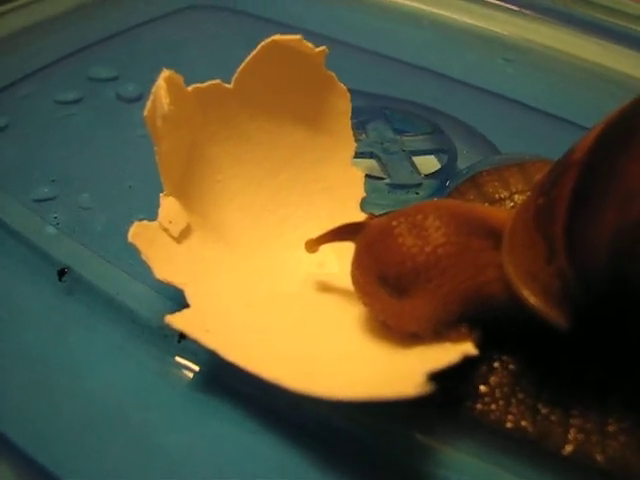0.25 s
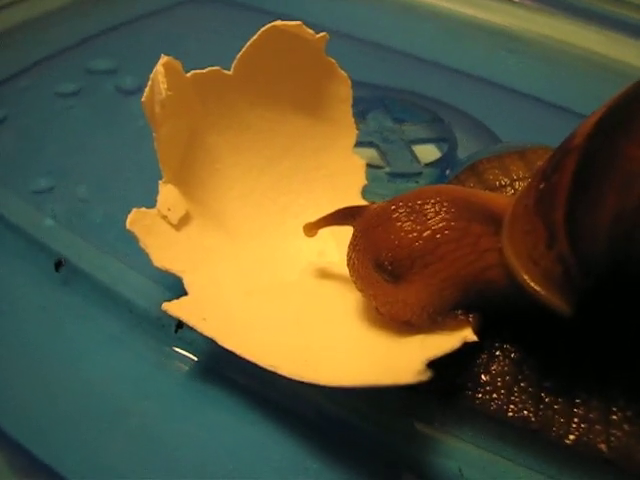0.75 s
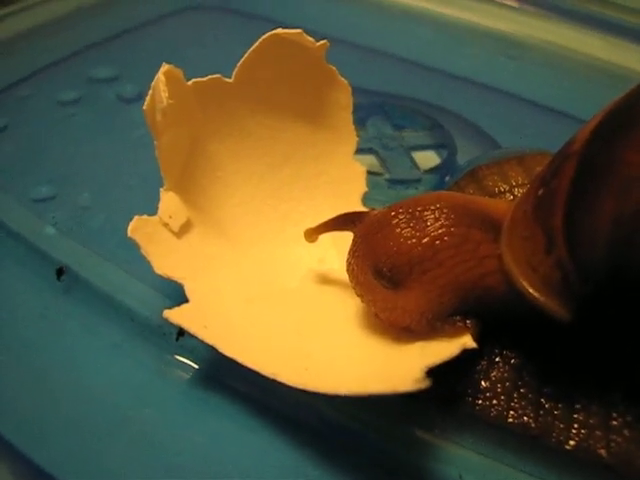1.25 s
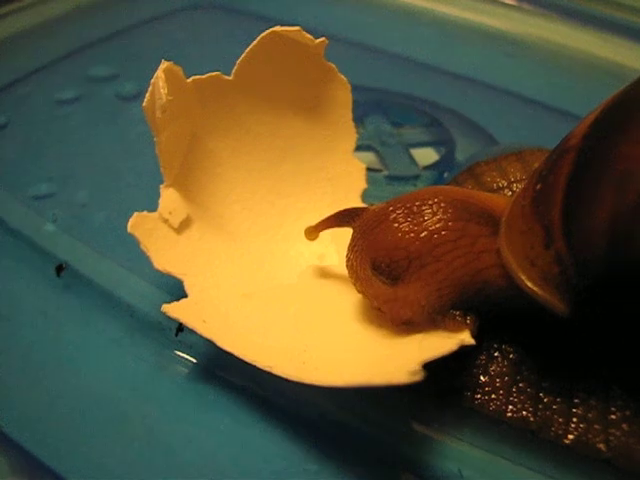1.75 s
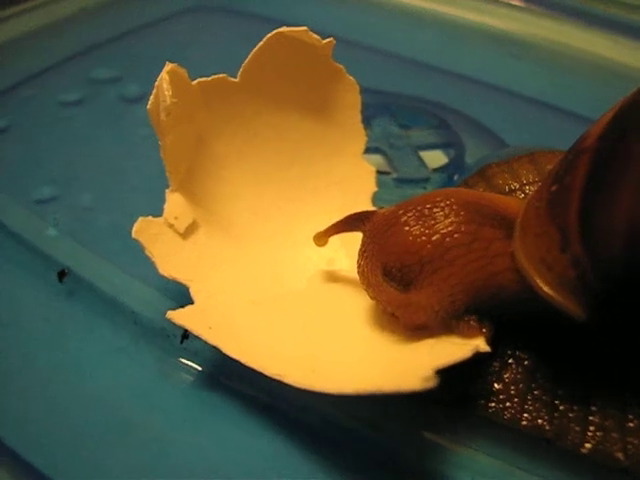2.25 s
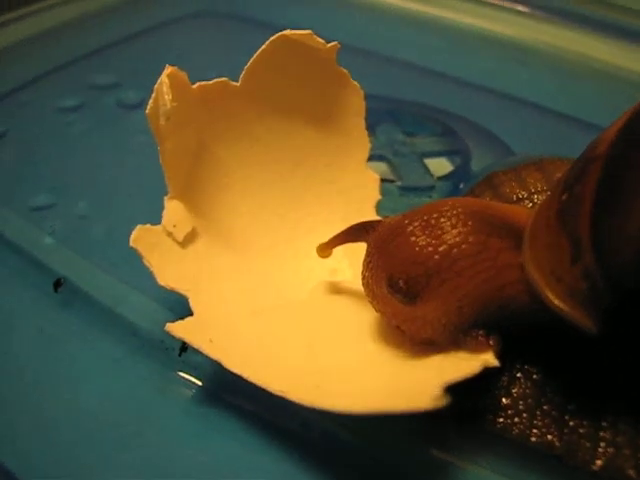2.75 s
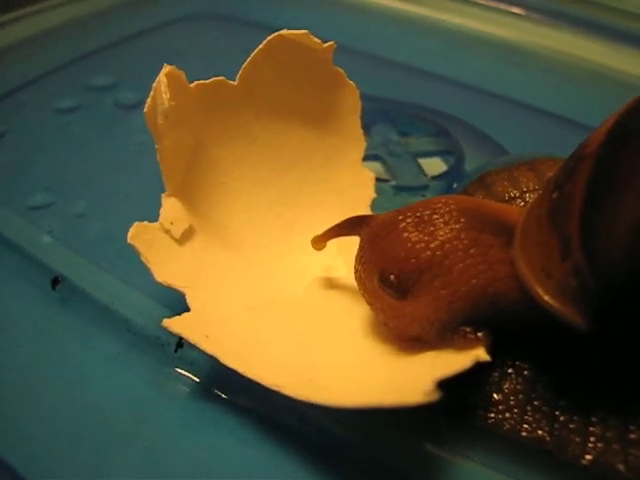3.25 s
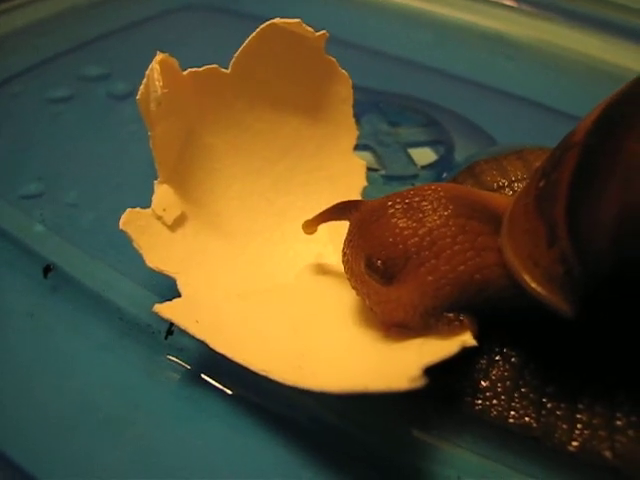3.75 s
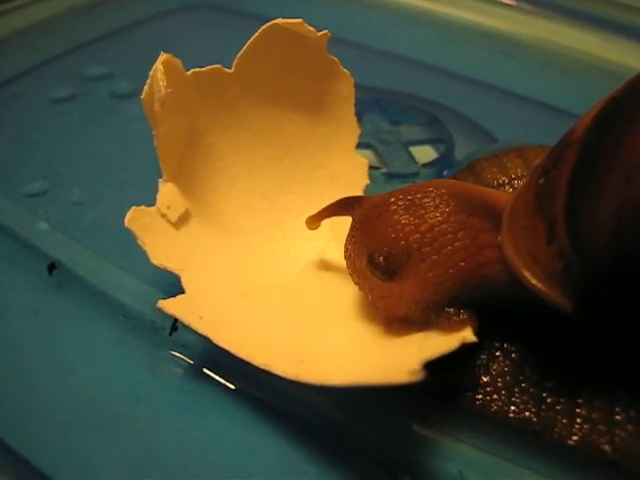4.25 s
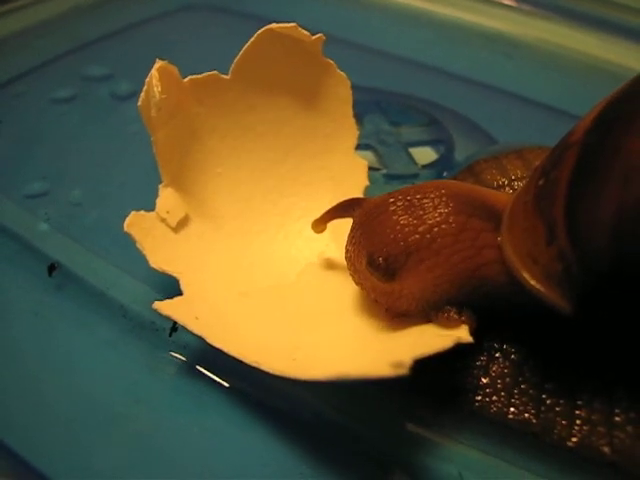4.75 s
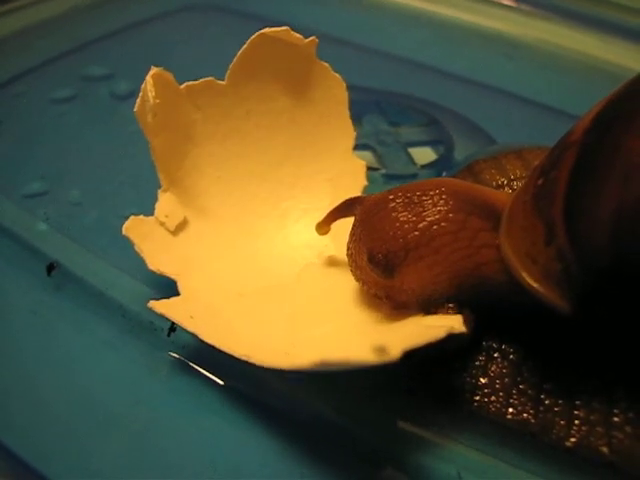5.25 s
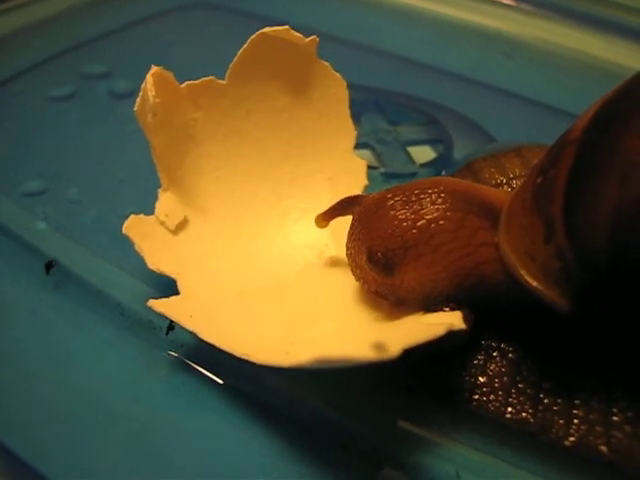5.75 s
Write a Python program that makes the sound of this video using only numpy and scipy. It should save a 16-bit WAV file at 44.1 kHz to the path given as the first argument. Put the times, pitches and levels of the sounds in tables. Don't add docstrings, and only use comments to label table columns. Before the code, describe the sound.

Close and dry in a small quiet room: faint hiss, hum and a steady very high tone underneath. After about a second, a brief crackling scrape of brittle shell, then mostly quiet with dull knocks from the hand-held camera and swelling rumble. Near four seconds the scratching returns harder, breaking into irregular bright cracks with faint short echoes, thinning towards the end.

```python
import sys
import numpy as np
from scipy import signal
from scipy.io import wavfile
from scipy.ndimage import uniform_filter1d, minimum_filter1d

SR = 44100
rng = np.random.default_rng(int(sys.argv[2]) if len(sys.argv) > 2 else 0)


def invert_db(level):
    return 10 ** (np.asarray(level, dtype=float) / 20)


def generate_wav(sig):
    pcm = np.round(np.clip(np.atleast_2d(sig).T, -1, 1) * 32767).astype(np.int16)
    wavfile.write(sys.argv[1], SR, pcm)


N = 264600

# f/Hz, level per Hz/dB
MURMUR = [(15, -36), (30, -33), (60, -17), (93, 0.5), (180, -6.5), (300, -2), (500, -6), (1000, -7.5),
          (1400, -9.5), (6800, -14), (8500, -13), (11000, -19), (15500, -23)]
# f/Hz, likeness/1
MURMUR_LIKENESS = [(60, 0.98), (160, 0.47), (420, 0.69), (1130, 0.28), (3010, 0.4), (8000, 0.031)]
# f/Hz, left-right level/dB
MURMUR_LEAN = [(60, -0.64), (160, -1.1), (420, 1), (1130, 1), (3010, -1.6), (8000, -0.11)]
# t/s, level/dB
HAND_SHIFTS = [
    (.1, -2),
    (1.73, 3),
    (2.02, 9.5),
    (2.3, 4),
    (2.9, 14),
    (3.37, 5),
    (3.69, 5),
    (4.77, 12),
    (5.11, 7),
    (5.5, 13),
]
# t/s, level/dB
GRIP = [(0.0, -47.5), (0.05, -51.5), (1.38, -50.5), (1.5, -54), (1.74, -49.5), (1.79, -54.5), (3.59, -54.5),
        (3.66, -56.5), (3.69, -50.5), (3.89, -56), (4.8, -57.5), (4.83, -58), (4.98, -56), (5.16, -57.5),
        (5.82, -54), (6.0, -56.5)]
# f/Hz, width/Hz, level/dB
BODY = [(401.8, 25.7, -12), (603.3, 46, -3.5), (1013, 87, 2.5), (726, 360, -34), (1330, 260, -23),
        (1230, 310, -9.5)]
# left-right level/dB, left lead/rad
BODY_PORTS = [(11.5, 0.085), (6, 1.3), (-14, 2.15), (11, 2), (-4, 2.7), (-17, 0.73)]
TREMOR_DB = [-6, -9, -11, -5, -20, -25]
# f/Hz, line it repeats on f/Hz, first restart t/s
WHINE_TONES = [(7867.13, 7852.15, .0048), (8262.5, 8250.05, .021)]
# left level/dB, right level/dB, left lead/rad
WHINE_PORTS = [(-48.5, -46, 0.24), (-58.5, -50.5, 2.24)]

# f/Hz, width/Hz, level/dB, left-right level/dB
SHELL_DEEP = [(1290, 250, -8, -6), (1630, 83, 3, -5), (1960, 100, 7, 2)]
SHELL_LOW = [(1480, 240, -9, -4), (2060, 195, -0.5, 1.5), (2890, 236, 2.5, -4.5), (3466, 193, 2, -7),
             (3616, 260, -1, 4)]
SHELL_MID = [(4940, 1230, 4.5, -1.5), (5440, 750, 6.5, -0.5)]
SHELL_MAIN = [(5600, 1670, -5.5, 4), (6203, 313, 10.5, -3)]
SHELL_UPPER = [(7080, 180, 0, 2)]
SHELL_EDGE = [(8380, 1250, -0.5, -16), (9780, 480, -6, -7), (11280, 900, -7, 2), (12630, 1300, -2.5, 1),
              (15800, 2300, 1, 3)]
# t/s, main ring level/dB, then low, middle and upper rings level re main/dB; here the first ticks,
# the light stroke, sparse slips after it and the start of the hard stroke
EARLY_SLIPS = [(0.0532, -49, -5.0, 15, -27), (0.1627, -42, 9, 7, 3), (0.1636, -44.0, -9, 17, -2),
               (1.1373, -42, 1, -3.0, -2.0), (1.1731, -33, -3, -15.0, -5), (1.1846, -19, -8, -7, 1),
               (1.1921, -40, -12.0, -17.0, -8.0), (1.1997, -40.0, -2.0, -1, -12.0),
               (1.2037, -39.0, -7.0, -16.0, -12.0), (1.206, -42.0, 5.0, -1.0, -1.0),
               (1.2169, -44.0, 0.0, 3.0, 3.0), (1.2178, -44.0, 1.0, 4.0, 1), (1.229, -26, -13.0, -8, -9),
               (1.256, -31, -6.0, -6, -4), (1.2585, -34, -10, -4.0, -7.0), (1.2627, -23, -23, -4, -14.0),
               (1.2659, -33, -10.0, -1.0, -9.0), (1.2682, -36.0, -14.0, -7.0, -9.0),
               (1.2717, -43.0, -11.0, -5.0, -2.0), (1.275, -38.0, -29.0, -13.0, -10.0),
               (1.2773, -40.0, 0, -4.0, -3.0), (1.2777, -42, -6, -10.0, -8.0),
               (1.2807, -46.0, 1.0, 0.0, 0.0), (1.2906, -32.0, -21.0, -11.0, -9.0),
               (1.295, -19, -9, -10, -12), (1.3004, -39.0, -7, -6.0, -4.0), (1.3019, -37, -4.0, -3.0, -2),
               (1.302, -42, -4.0, -10.0, -4), (1.3035, -45.0, -1, -4.0, 3.0),
               (1.3053, -39.0, -7.0, -20.0, -2), (1.3247, -41.0, -23.0, -3.0, -27.0),
               (1.3411, -23, -0.5, 10, 8), (1.3437, -31, -6, -11, -10), (1.3427, -39, -16, -15, -1),
               (1.3748, -30, -6, -12, 1), (1.3985, -27.5, 1, -6, -9.0), (1.4106, -43, -3, -11.0, -11.0),
               (1.4204, -28, 0, -14, -4), (1.4231, -31, -6, -21.0, -8.0), (1.4268, -19.5, -13, -9, -7),
               (1.4475, -36, -5, -23.0, -3.0), (1.459, -20.5, -5.5, -22, -7),
                 (1.465, -25.0, -8, -17.0, -11.0), (1.4725, -40, -2, -7.0, -7.0),
                 (1.4956, -25.0, -19.0, -13, 0), (1.507, -34.0, -7, -24.0, -9.0),
                 (1.511, -39, -1.0, -12.0, -6.0), (1.5123, -37.0, 2, -21.0, -6.0),
                 (1.5342, -28.5, -1, -12, -9.0), (1.5598, -11.5, -7, -17, -14), (1.5619, -18, 1, 7, -11.0),
                 (1.5632, -14.5, -2, 4, -12), (1.5727, -41, 1.0, 1.0, -10.0), (1.5778, -28, -11, -9, -10),
                 (1.5788, -19, -17, -9.0, -10.0), (1.6878, -44, 10, 3.0, 1), (1.7291, -36.0, 7.5, 10, -3),
                 (2.0538, -25, -13, -15, -12.0), (2.06, -34, -5, -5, -7), (2.0628, -29, -5, -6, -10),
                 (3.6819, -37, 8.0, 7, 3), (3.6963, -39, 5, 5, 8), (3.7246, -42, 11.0, 9, -2.0),
                 (3.8472, -40, -5, 10, 10), (3.8562, -43.0, -4.0, -2, -4), (3.8763, -36, -4, -1, -3.0),
                 (3.8894, -45, -1, 10, 7.0), (3.9337, -32.0, -15, -5.0, 1), (3.9441, -35, -1.0, 0.0, -5.0),
                 (3.949, -37.0, 1, 0, 5), (3.9486, -39.0, -7.0, -3.0, 3.0), (3.949, -35, -4, -7.0, 1.0),
                 (3.9578, -34.5, -3.0, -9.0, 4), (3.9604, -46.0, -5.0, -3.0, 1.0),
                 (3.9622, -45, -1, -11.0, -1.0), (3.9949, -24.5, -10.0, -7, 1),
                 (4.0021, -40.0, -17.0, -20.0, 4), (4.0277, -26.0, -3.0, 5, -8),
                 (4.031, -33, -4, -6.0, -1.0), (4.039, -32, -13.0, -5.0, -3.0)]
HARD_SLIPS = [(4.0548, -36.0, -10, -2.0, 4), (4.0562, -34, -10.0, -7.0, -7.0),
              (4.0571, -32.0, -12, -7.0, -5.0), (4.0612, -28.0, 1, -11.0, -12.0),
              (4.0675, -25.5, -0.5, 8, 2), (4.0748, -16.0, -11, -0.5, -5), (4.0827, -26, -10.0, -3.0, 1),
              (4.0882, -40, -4.0, 0.0, -2.0), (4.0939, -30, -19.0, -6.0, -3), (4.0995, -30, -13, -5.0, -1),
              (4.1053, -35.0, -11, -8.0, -15), (4.114, -29, -12, -7.0, -1),
              (4.1277, -38.0, -17.0, -32.0, -7.0), (4.139, -30.0, -21.0, -14.0, -19.0),
              (4.141, -31, -8, -10.0, -1.0), (4.1515, -29, -9, -4.0, -5.0), (4.1529, -30.0, -3, -2, -6),
              (4.1548, -10, -10.5, -15, 3), (4.174, -20, -20.0, -8, -3.0), (4.1876, -25, -17.0, -9, -1.0),
              (4.1898, -13.0, -10.5, -12, -0.5), (4.2275, -30, 3, -4, 4), (4.2292, -26, -17, 8, -2.0),
              (4.2303, -17.5, -12, 6, -15), (4.2344, -28, -16, -12.0, -8.0),
              (4.2406, -39.0, -3.0, 1.0, -6.0), (4.256, -19, -9, -16.0, 3), (4.2581, -11.0, -12.0, -1, 4.5),
              (4.2705, -30.0, -13.0, -14.0, 1.0), (4.2716, -33, -11.0, -9.0, 1.0),
              (4.2755, -32.0, -12.0, -12.0, -5.0), (4.287, -16, -16, -14, -7),
              (4.2923, -15.5, -17.0, -12.0, -11), (4.2962, -18.0, -16.0, -13.0, -4),
              (4.306, -24, -5, -10.0, -15), (4.316, -19, 3, 8, 8), (4.3204, -18.5, -1.0, -3.0, 1),
              (4.3224, -12, -11, -4.0, 2), (4.3344, -33, -7.0, -11.0, -1.0),
              (4.335, -35, -7.0, -14.0, -4.0)]
BITES = [(4.3799, -33, -11.0, -4, 3), (4.3821, -13.5, 0.0, 8, -4), (4.3949, -19, -5, 0, -5.0),
         (4.3973, -25, -4.0, -6.0, -8), (4.4002, -24, -22, -12, 2), (4.4011, -18, -4.5, -11, -10),
         (4.4158, -32.0, -8.0, -2.0, -7.0), (4.4447, -23.0, -16.0, -11, -10),
         (4.5033, -36.0, -16.0, -5.0, -26.0), (4.5188, -31.5, -8.0, -3, -3.0), (4.563, -26, -7.0, 2, 0),
         (4.5958, -31, -14.0, -11.0, -10.0), (4.6159, -16.5, -16, -1, -8), (4.645, -5.5, -8.5, 1, -14),
         (4.7009, -17, -4, -10.0, -7), (4.7041, -34, 2, -3, -5.0), (4.708, -4.5, -11.0, 2.5, -16),
         (4.7599, -11, -2.5, -3, -2.0), (4.7737, -4.5, -12, 3, -15), (4.785, -10, -6.5, -15, 0),
         (4.7933, -23, -12, -10.0, -11.0), (4.8097, -1.5, -7.5, -14, -15), (4.8686, -17, -7.5, 1, -3),
         (4.871, -13.5, -10.0, -8.0, -12), (5.017, -33.0, -15, -14, -12), (5.1065, -4, -19, -5.5, -34),
         (5.1106, -8.5, -6, -6.0, -20), (5.2208, -34, 1, 2, -15.0), (5.37, -41, -3.0, 0.0, -19.0),
         (5.4521, -38, -9.0, -3.0, -3.0), (5.4568, -6.0, -10.5, 5, -7), (5.466, -26, -13.0, -6.0, -2.0),
         (5.4814, -8.5, -10.5, -14, -5.0), (5.5168, -11, 1, -7, 7), (5.5185, -5, -10.5, -10, -7),
         (5.533, -37.0, 4.0, -3.0, 1.0), (5.5334, -29.0, -3, -5, -3.0), (5.5366, -29, 0.0, 11, -5.0),
         (5.5388, -29, -4, 0, -3.0), (5.5428, -34.0, -5, -4.0, -4.0)]
# f/Hz, width/Hz
SHELL_DIPS = [(4150, 400)]
# t/s, level/dB
WALL_ECHOES = [
    (0.0126, -23),
    (0.0176, -33.5),
]
# f/Hz, time to fall 60 dB t/s
ROOM_DECAY = [(300, 0.076), (2000, 0.24), (6000, 0.3), (12000, 0.14)]
# f/Hz, level/dB
ROOM_COLOUR = [(1500, 2), (2300, 13), (3300, 6.5), (4500, 2.5), (5500, 1.5), (6250, 0.5), (7200, 4.5),
               (9000, 3.5)]
# t/s, peak level/dB
ROCKS = [(.1636, -40), (1.34, -32), (1.5592, -26), (4.1542, -27), (4.323, -40), (5.1063, -29),
         (5.4562, -20), (5.4813, -40), (5.519, -18), (2.062, -38), (4.3822, -38), (4.6433, -44)]
# t/s, peak level/dB, thin tick level re peak/dB
CREAKS = [(0.166, -45.5, 21), (0.287, -45.5, -6), (0.778, -42.5, -1), (0.9721, -40.5, 2.5),
          (1.3379, -55, 1), (1.5656, -39, 20), (1.586, -41, 14.5), (1.619, -39, 1), (1.6415, -36.5, -3),
          (1.649, -38.5, -10), (1.6879, -32.5, 1), (1.728, -29, 6), (1.7396, -68, -10.0),
          (3.1662, -47, -9.5), (3.2053, -41, -18), (3.2531, -40.5, -16), (3.365, -36, -6), (3.6819, -32, 0),
          (3.696, -32.5, 2), (3.7251, -30, 7), (3.1435, -46.5, -12), (3.1865, -46, -12), (3.2202, -47, -12),
          (1.599, -47, -12), (2.001, -47.5, -12), (2.646, -45.5, -8)]
# f/Hz, width/Hz, level/dB, left-right level/dB
CREAK_TICK = [(1660, 390, -2, -5), (2780, 990, -4.5, -8), (3400, 490, 6, -12), (4170, 470, -3.5, -10),
              (5230, 1100, 5, -19)]
# start t/s, length t/s, level/dB
DRAGS = [
    (0.88, 0.36, -56),
    (1.164, 0.18, -50.5),
    (1.362, 0.19, -48.5),
    (3.83, 0.12, -55),
    (4.03, 0.14, -49.5),
    (4.21, 0.12, -48),
    (4.625, 0.19, -43.5),
    (5.338, .06, -68),
    (5.468, 0.14, -47.5),
]


def read(points, hz):
    f, value = np.transpose(points)
    return np.interp(np.log(hz + 1), np.log(f + 1), value)


def evened(x):
    return x / np.sqrt(np.mean(x ** 2) + 1e-20)


def add(mix, s, sound):
    part = mix[:, round(s * SR):][:, :sound.shape[1]]
    part += sound[:, :part.shape[1]]


def above(x, hz):
    return signal.sosfilt(signal.butter(3, hz, "high", fs=SR, output="sos"), x)


def hiss(level_db=-48.5, patchy_db=1.47, shift_s=0.029):
    frames, hz = N // 256 + 5, np.fft.rfftfreq(1024, 1 / SR)
    a, b, c, d, patches = rng.standard_normal((frames, 513, 5)).T
    patches = evened(uniform_filter1d(uniform_filter1d(patches, 6, 0), 10, 1))
    patches = patches * (1 + 100 / (hz + 200))[:, None]

    same = np.clip(read(MURMUR_LIKENESS, hz), -1, 1)[:, None]
    left = a + 1j * b
    right = same * left + np.sqrt(1 - same ** 2) * (c + 1j * d)
    z = np.array([left, right])
    z *= invert_db(read(MURMUR, hz)[:, None] + patchy_db * patches)

    s, grip_db = np.transpose(GRIP)
    t = np.arange(frames) * 256 / SR
    rumble_db = np.interp(t, s, grip_db - grip_db.mean())
    for at, db in HAND_SHIFTS:
        rumble_db = rumble_db + db * np.exp(-((t - at) / shift_s) ** 2)
    z *= invert_db(rumble_db / (1 + (hz[:, None] / 300) ** 2))
    z *= invert_db(read(MURMUR_LEAN, hz)[:, None] * np.array([.5, -.5])[:, None, None])
    noise = signal.istft(z, nperseg=1024, noverlap=768)[1][:, :N]
    return invert_db(level_db) * evened(noise)


def body(blows, levels_db):
    t, taps, side = np.arange(3000) / SR, 0, np.array([[.5], [-.5]])
    for (hz, width, _), db, (lean_db, lead) in zip(BODY, levels_db, BODY_PORTS):
        swing = np.sin(2 * np.pi * hz * t + lead * (side + .5))
        taps = taps - invert_db(db + lean_db * side) * np.exp(-np.pi * width * t) * swing
    return signal.oaconvolve(blows[None], taps)[:, :N]


def hum(per_s=500., spread_db=4.0):
    size = invert_db(spread_db * np.minimum(rng.exponential(1, N), 3))
    pushes = rng.standard_normal(N) * size * (rng.random(N) < per_s / SR)
    level = invert_db(np.interp(np.arange(N) / SR, *np.transpose(GRIP)))
    return evened(above(body(pushes, TREMOR_DB), hz=334)) * level


def whine(frame_hz=30000 / 1001):
    out = 0
    for (hz, line_hz, s), (left_db, right_db, lead) in zip(WHINE_TONES, WHINE_PORTS):
        t = np.arange(N) / SR - s
        start = np.floor(t * frame_hz) / frame_hz
        phase = 2 * np.pi * (hz * (t - start) + line_hz * start)
        out = out + invert_db([[left_db], [right_db]]) * np.sin([phase + lead, phase])
    return out


def ring(modes, t, chance, scatter_db=2.0, detune=.012):
    port_lag_s = .000017
    rise_s, first_swing_s, lasting_share = 0.00019, .0005, .4
    hz, width, db, lean_db = np.transpose(modes)[:, :, None]
    size, tune, start, port = chance[:len(modes)].T[:, :, None]
    phase = 2 * np.pi * hz * (1 + detune * tune) * t + .3 * start
    left = invert_db(lean_db / 2) * np.sin(phase)
    right = invert_db(-lean_db / 2) * np.sin(phase - 2 * np.pi * hz * port_lag_s + .15 * port)
    dying = invert_db(db + scatter_db * size) * np.exp(-np.pi * width * t)
    both = -(dying * np.array([left, right])).sum(1)
    both = both * (1 - np.exp(-(t / rise_s) ** 2))
    both = both * (lasting_share + (1 - lasting_share) * np.exp(-(t / first_swing_s) ** 2))
    return both / np.abs(both.mean(0)).max()


def snap(levels_db, chance):
    t = np.arange(700) / SR
    rings = (SHELL_MAIN, SHELL_LOW, SHELL_MID, SHELL_UPPER, SHELL_EDGE)
    return sum(invert_db(db) * ring(modes, t, c) for modes, db, c in zip(rings, levels_db, chance))


def snaps():
    out, rows = np.zeros((2, N)), EARLY_SLIPS + HARD_SLIPS + BITES
    chances = rng.standard_normal((len(rows), 5, 5, 4))
    for (s, db, low_db, mid_db, upper_db), chance in zip(rows, chances):
        edge_db = -9.5 + 0.3 * db - chance[0, 4, 0]
        levels_db = [0, low_db - 1.5, mid_db - 2.5, upper_db - 4.0, edge_db]
        add(out, s, invert_db(db + 5.5) * snap(levels_db, chance))
    return out


def cup(x):
    for hz, width in SHELL_DIPS:
        x = .25 * x + .75 * signal.lfilter(*signal.iirnotch(hz, hz / width, SR), x)
    return above(x, hz=1410)


def tray(x):
    taps = np.zeros((2, 480))
    at = rng.integers(50, 480, (2, 24))
    np.put_along_axis(taps, at, rng.standard_normal(at.shape) * np.exp(-at / 300.0), 1)
    taps = taps / np.linalg.norm(taps, axis=1)[:, None]
    return signal.oaconvolve(x, taps, axes=1)[:, :N]


def room(x):
    taps = np.zeros((2, SR // 2))
    at = np.arange(500, SR // 2 - 20, 20) + rng.integers(0, 20, (2, (SR // 2 - 501) // 20))
    np.put_along_axis(taps, at, rng.choice([-1., 1.], at.shape), 1)
    hz, t, z = signal.stft(taps, SR, nperseg=128)
    tail_db = read(ROOM_COLOUR, hz)[:, None] - 60 * t / read(ROOM_DECAY, hz)[:, None]
    tail = signal.istft(z * invert_db(tail_db), SR, nperseg=128)[1]
    return signal.oaconvolve(x.mean(0)[None], tail / np.sqrt(SR / 900), axes=1)[:, :N]


def rocks():
    out, t = np.zeros((2, N)), np.arange(700) / SR
    for (s, db), chance in zip(ROCKS, rng.standard_normal((len(ROCKS), 3, 4))):
        add(out, s, invert_db(db) * ring(SHELL_DEEP, t, chance))
    return out


def creaks():
    blows, ticks, t = np.zeros(N), np.zeros((2, N)), np.arange(300) / SR
    for (s, db, tick_db), chance in zip(CREAKS, rng.standard_normal((len(CREAKS), 5, 4))):
        blows[round(s * SR)] = invert_db(db + 2.5)
        add(ticks, s, invert_db(db + tick_db) * ring(CREAK_TICK, t, chance))
    return body(blows, np.transpose(BODY)[2]) + ticks


def grit(per_s=700.0, spread_db=7.0, rise_s=0.027, fall_s=0.038):
    t, out, level = np.arange(N) / SR, np.zeros((2, N)), np.zeros(N)
    for s, length, db in DRAGS:
        swell = np.minimum((t - s) / rise_s, (s + length - t) / fall_s)
        level += invert_db(db) * np.clip(swell, 0, 1)
    kind = rng.integers(0, 12, N)
    size = invert_db(spread_db * np.minimum(rng.exponential(1, N), 2)) * (rng.random(N) < per_s / SR)
    for k, chance in enumerate(rng.standard_normal((12, 5, 5, 4))):
        tiny_snap = snap([2, -1.0, -11.0, -2.0, -11.0], chance)
        out += signal.oaconvolve((size * (kind == k))[None], tiny_snap)[:, :N]
    return evened(out) * level


def lid(hz=790, t60_s=0.063, level_db=-47, rise_s=0.0066):
    out, t = np.zeros((2, N)), np.arange(8000) / SR
    wave = np.sin(2 * np.pi * hz * t) * np.minimum(t / rise_s, 1) * np.ones((2, 1))
    for s, db, *_ in HARD_SLIPS + BITES:
        add(out, s, invert_db(db / 2 + 5.0 + level_db - 60 * t / t60_s) * wave)
    return out


def scene():
    shell = cup(snaps() + grit())
    echoes = invert_db(-22.5) * tray(shell) + invert_db(-16.0) * room(shell)
    for s, db in WALL_ECHOES:
        add(echoes, s, invert_db(db) * shell[::-1])
    camera = above(creaks(), hz=199) + hum() + hiss() + whine()
    return shell + echoes + lid() + camera + above(rocks(), hz=1090)


def starve(x):
    hz, _, z = signal.stft(x, SR, nperseg=256)
    power_db = 10 * np.log10(uniform_filter1d((np.abs(z) ** 2).mean(0), size=6, axis=0) + 1e-20)
    recent_db = -minimum_filter1d(-power_db.max(0), size=13, origin=4)
    luck = np.kron(rng.standard_normal((22, len(recent_db) // 3 + 1)), np.ones((6, 3)))
    luck = luck[:len(hz), :len(recent_db)]
    mark_db = -64.5 + .25 * recent_db - 8 * (hz[:, None] / 15000) ** 2 + 4 * luck
    kept = (power_db > mark_db) | (hz[:, None] < 8700) | (recent_db < -45)
    return signal.istft(z * kept, SR, nperseg=256)[1][:, :N]


def roll_off(x):
    return signal.sosfilt(signal.butter(12, 15700, fs=SR, output="sos"), x)


def record(dry):
    recover_s, dip_start_db, dip_share = .085, -11, .75
    peak_db = 20 * np.log10(uniform_filter1d(np.abs(dry).max(0), 40) + 1e-9)
    fall = np.arange(N) / SR / recover_s
    excess = np.log(np.maximum(np.minimum(peak_db, 0) - dip_start_db, 1e-9))
    over_db = np.exp(np.maximum.accumulate(excess + fall) - fall)
    late_db = signal.lfilter([1 / 200], [1, 1 / 200 - 1], over_db)
    clipped = np.clip(dry / invert_db(dip_share * late_db), -1, 1)
    return roll_off(starve(clipped))


dry = scene()
out = record(dry)
generate_wav(out)
```